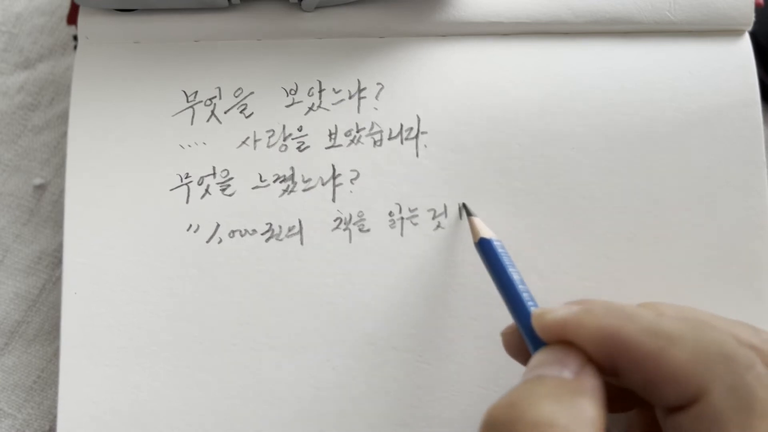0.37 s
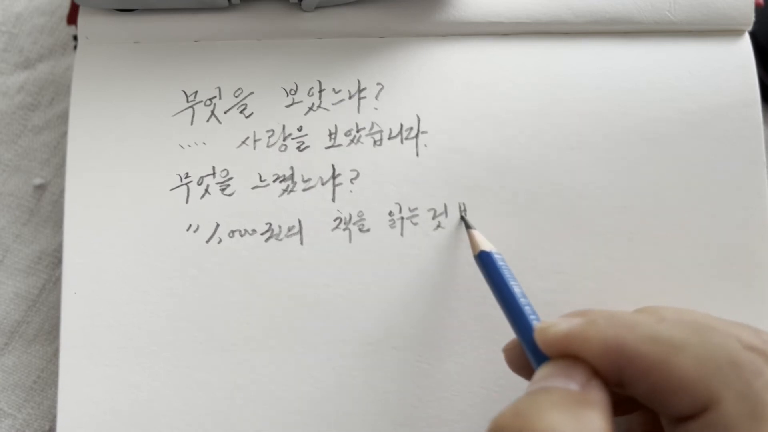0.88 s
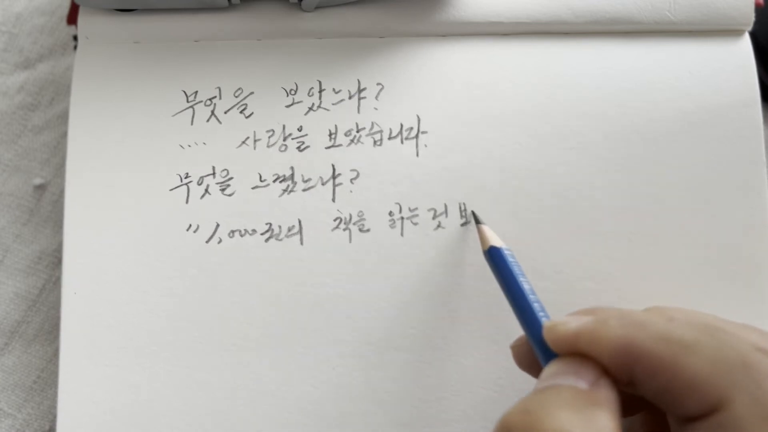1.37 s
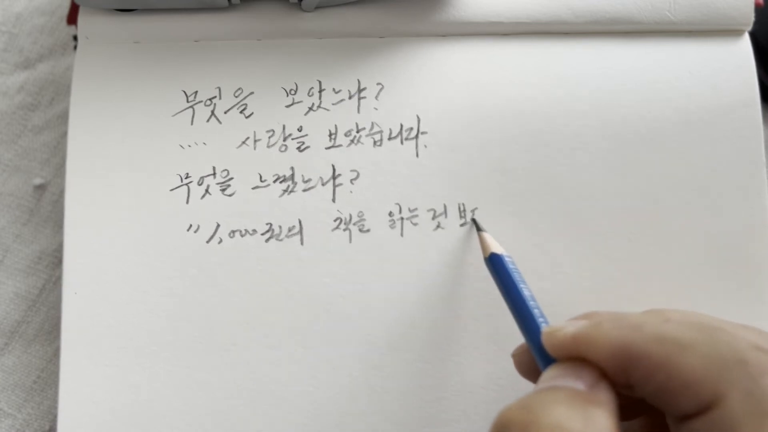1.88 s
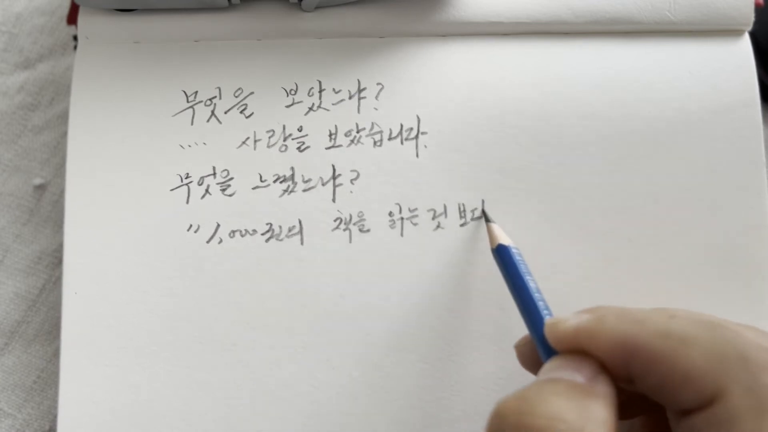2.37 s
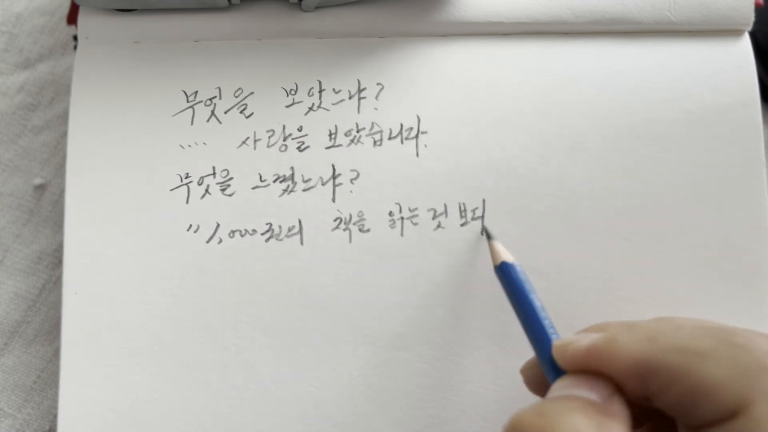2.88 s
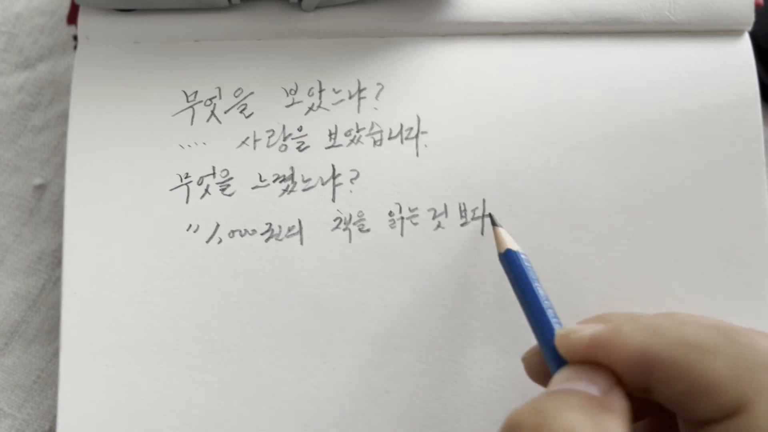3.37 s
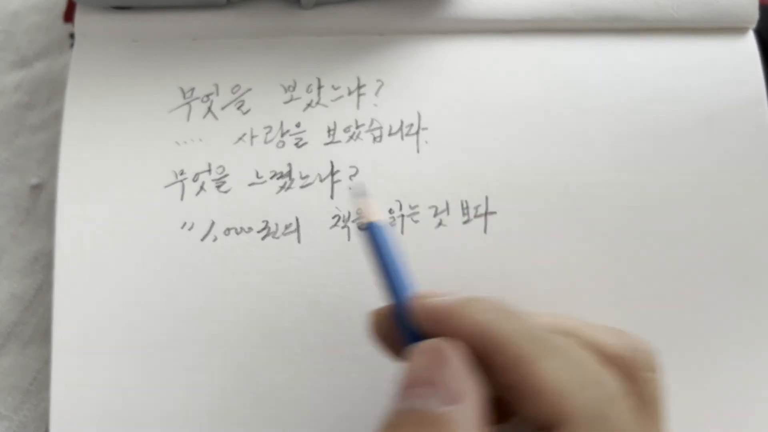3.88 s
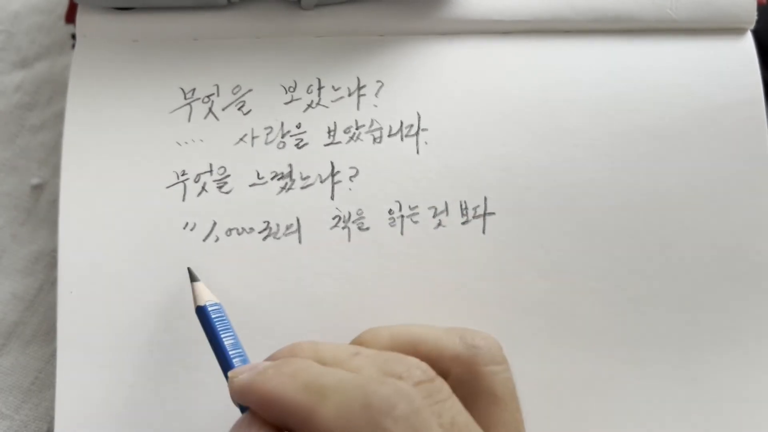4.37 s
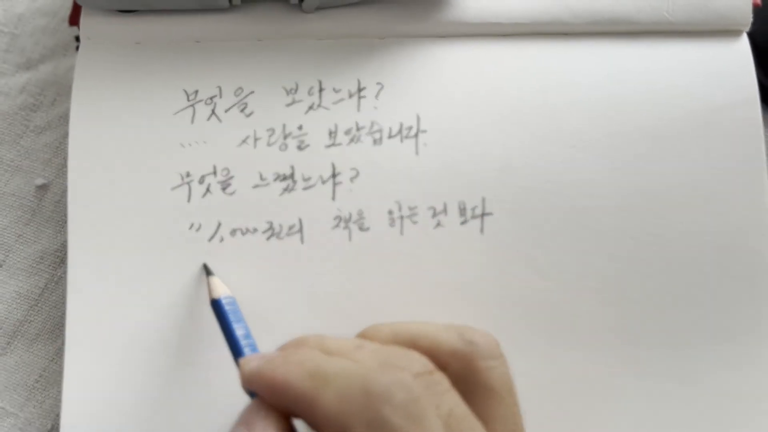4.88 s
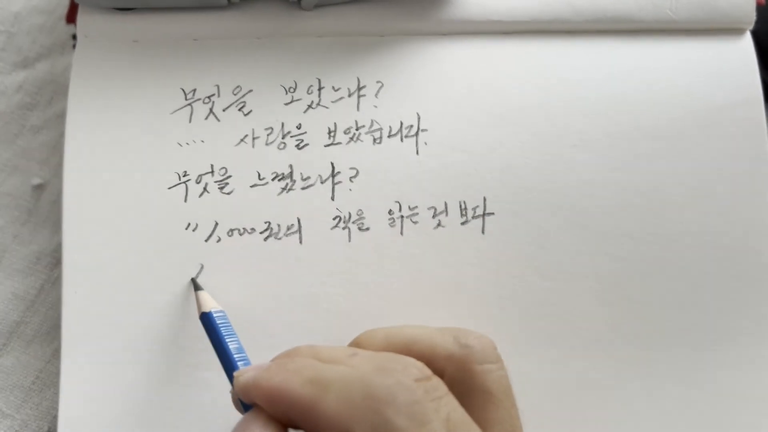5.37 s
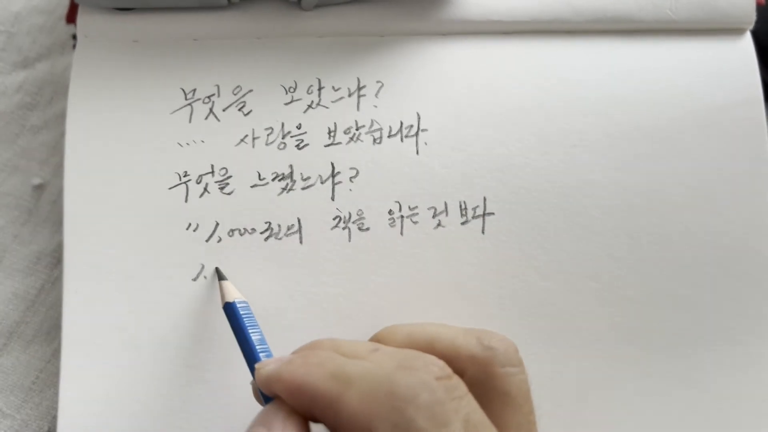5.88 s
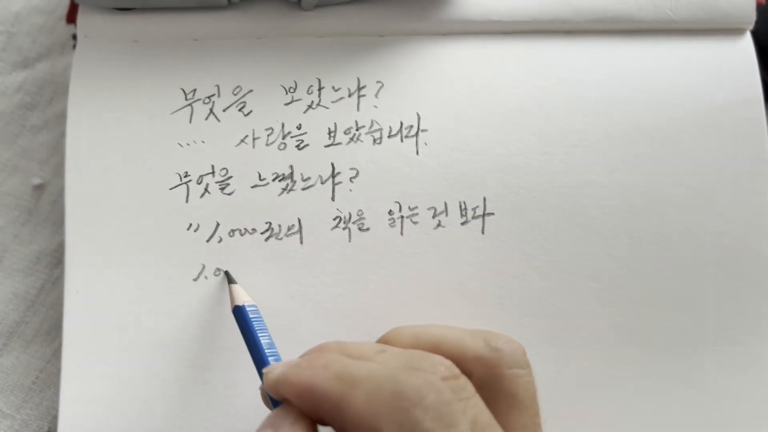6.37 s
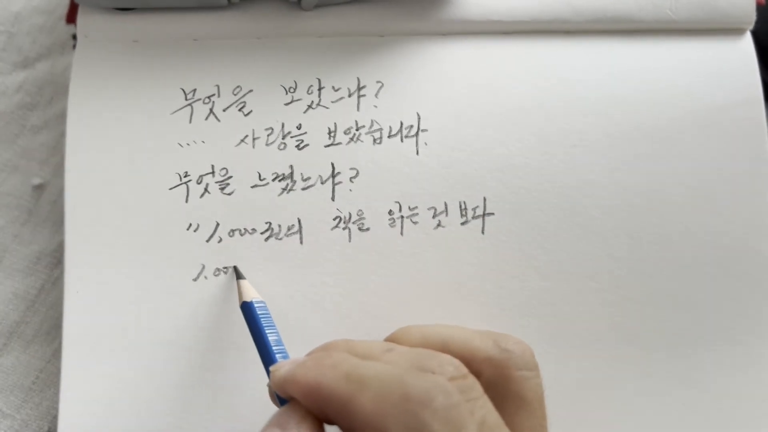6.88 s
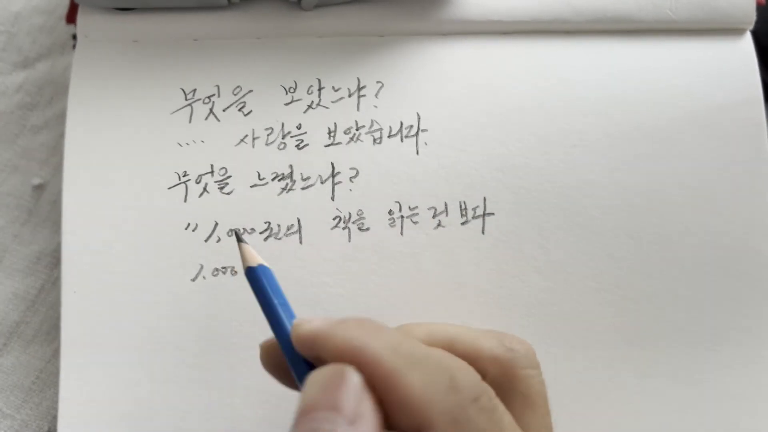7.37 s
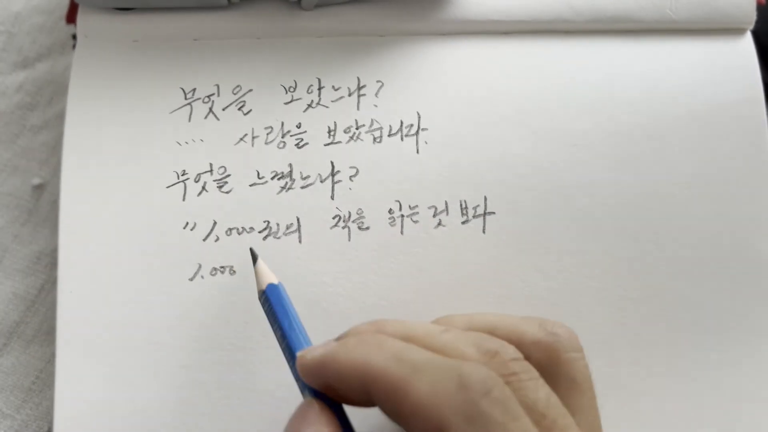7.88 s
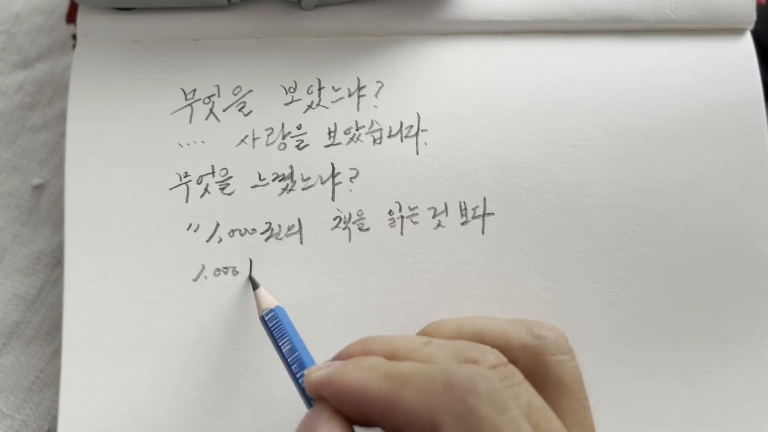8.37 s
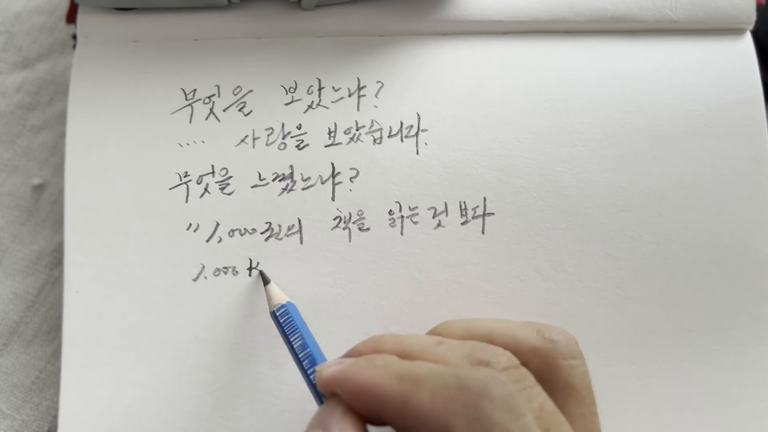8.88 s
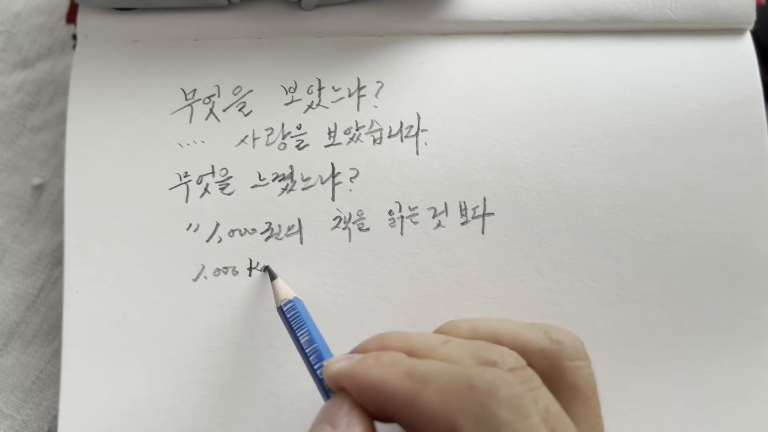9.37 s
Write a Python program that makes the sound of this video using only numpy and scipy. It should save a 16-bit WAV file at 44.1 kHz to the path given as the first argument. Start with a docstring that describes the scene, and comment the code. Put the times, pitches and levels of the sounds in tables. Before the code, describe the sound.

A pencil scratches short, dry strokes on a sketchbook page, with light taps, a hand rustle and low desk thumps in a quiet room.

```python
"""A pencil stroke scrapes over a low desk thump, then short strokes and taps follow, close and mono.
The lead catches on paper fibres and rings tip, sharpened cone, barrel and sketchbook; landings knock them.
A trembling, jolting arm booms the desk, and the hand slides on the page with a hiss and bumps the desk.
A short wash from the walls surrounds the close sounds; mains hum and steady room noise lie underneath."""
import sys
import numpy as np
from scipy import signal
from scipy.fft import rfft, irfft
from scipy.io import wavfile
from scipy.ndimage import uniform_filter1d

SR = 44100
rng = np.random.default_rng(int(sys.argv[2]) if len(sys.argv) > 2 else 0)


def magnitude_from_level(level_db):
    """Linear magnitude for a level in decibels (20 dB per decade)."""
    exponent = np.asarray(level_db, float) / 20
    return 10 ** exponent


def put_to_file(sound):
    """Save the sound as 16-bit audio at rate SR, in the file named by the first command-line argument."""
    columns = np.atleast_2d(sound).T  # one column per channel
    safe = np.clip(columns, -1, 1)
    whole_steps = np.round(safe * 32767)
    wavfile.write(sys.argv[1], SR, whole_steps.astype(np.int16))


N = 429534
TIME = np.arange(N) / SR

# pencil strokes: (start [s], speeding up [s], slowing down [s], tip hiss [dB], book minus tip [dB],
# pointedness of the speed arch [exponent])
STROKES = [(0.0, 0.004, 0.092, -51.5, 9, 0.69), (0.24, 0.043, 0.013, -63.5, 11.5, 1),
           (0.379, 0.084, 0.045, -53.5, 10, 0.56), (0.545, .017, 0.019, -61.5, 10.5, 1.1),
           (0.602, 0.034, .025, -71, 8.5, .8), (0.697, 0.039, 0.076, -58, 3.5, 0.83),
           (0.803, 0.011, 0.027, -66, 6, .6), (0.83, 0.037, .028, -62.5, 4, .5),
           (0.92, 0.013, .045, -60.5, 7, 0.84), (0.95, 0.06, .03, -61, 11, 0.43),
           (0.985, 0.061, 0.061, -49.5, 0.5, 1.27), (1.156, 0.022, 0.1, -53.5, -0.5, 0.72),
           (1.395, .015, .03, -83, 15, .4), (1.434, 0.039, 0.063, -54.5, 1.5, 0.71),
           (1.544, 0.011, .035, -60.5, 0.5, 1), (1.606, 0.11, .04, -62.5, 7.5, 0.67),
           (1.671, 0.044, 0.047, -48.5, 2.5, 0.95), (1.84, 0.0084, 0.11, -54, 0.5, 0.41),
           (1.89, 0.061, 0.045, -58.5, 7, 0.66), (2.0, 0.046, 0.014, -63, 6, 0.59),
           (2.113, 0.042, 0.031, -65.5, 10, 0.53), (2.27, .03, .1, -55, 10.5, 0.54),
           (2.3, 0.1, 0.12, -53.5, 8.5, 0.49), (2.5, .08, 0.16, -60.5, 12.5, 0.44),
           (2.818, 0.027, 0.02, -54.5, 4.5, 1.4), (2.96, 0.043, .03, -82.5, 16, .4),
           (3.107, 0.03, .03, -61.5, 7.5, 0.85), (3.13, 0.082, 0.05, -57, 8, 0.59),
           (3.307, 0.023, 0.015, -64, 3.5, 1.2), (4.77, .04, 0.036, -74, 12.5, .4),
           (4.929, 0.039, 0.022, -75.5, 19.5, 1.1), (5.101, .015, .05, -67, 13.5, .5),
           (5.147, 0.031, 0.1, -57, 6.5, 0.37), (5.2, 0.048, 0.062, -56, 5, 0.81),
           (5.27, 0.041, .022, -69, 20, 0.72), (5.35, .017, .015, -63.5, 3, 1.5),
           (5.385, 0.026, .08, -80, 8, 0.45), (5.591, .013, 0.037, -64, 15.5, 0.9),
           (5.64, 0.039, .025, -69, 5, 0.69), (5.867, 0.048, .065, -55.5, 3.5, 0.92),
           (5.95, 0.056, 0.037, -61, 10.5, 0.51), (6.02, 0.042, 0.044, -64.5, 12.5, 0.34),
           (6.13, 0.084, 0.087, -64.5, 13.5, 0.33), (6.32, 0.011, 0.13, -64.5, 9.5, 0.43),
           (6.449, 0.037, 0.077, -67.5, 17, 1.16), (6.55, .07, 0.026, -76.5, 5, 0.45),
           (6.767, 0.066, 0.035, -57.5, 8.5, 0.67), (6.932, 0.059, .11, -61.5, 9.5, 0.66),
           (7.085, 0.017, 0.041, -58, 5.5, 0.83), (7.156, 0.032, 0.042, -61.5, 10, 0.84),
           (7.415, 0.024, 0.023, -70.5, 17.5, 1), (8.225, 0.12, 0.052, -51.5, 12.5, 1.5),
           (8.415, 0.029, 0.0092, -71.5, 17.5, 1.2), (8.563, 0.0088, 0.0092, -68, 8, 1.1),
           (8.598, 0.052, 0.062, -54.5, 5, 0.65), (8.715, 0.026, 0.09, -59, 4, .4),
           (8.748, 0.053, 0.045, -59, 10, .4), (8.838, 0.034, .025, -76, 14.5, .4),
           (9.026, 0.047, 0.044, -66, 10, .5), (9.05, 0.07, 0.022, -56.5, 2, 1.2),
           (9.15, 0.044, 0.062, -60.5, 9.5, 0.29), (9.297, .013, 0.05, -57, 7, 0.86),
           (9.34, 0.042, 0.024, -62, 3.5, .4), (9.44, 0.028, 0.028, -81, 18.5, 0.55),
           (9.535, 0.03, .05, -62.5, 10, 0.47), (9.56, 0.055, 0.025, -58.5, 8, 0.53),
           (9.692, 0.057, .03, -55.5, 9, 0.89)]
# resonances of each body: (frequency [Hz], nominal width [Hz], relative level in each of three grips [dB] x 3)
TIP = [(4770, 1320, -3.5, -4.5, -6), (5460, 400, 0, -3.5, -2.5), (6120, 176, 2.5, -3, -4),
       (6800, 680, 0.5, -5.5, -8.5), (7620, 700, 1.5, -3.5, -4.5), (8580, 690, -1, -4, -7),
       (9410, 500, -7, -10, -15), (10410, 460, -5.5, -8.5, -9.5), (11500, 340, -9, -11.5, -14),
       (12050, 370, -7, -14, -13), (13200, 290, -22, -10, -9), (14270, 150, -29, -3, -29),
       (14430, 590, -5, -5, -13), (15500, 450, -15, -14, -26)]
CONE = [(2826, 247, 2, 2.5, 1.5), (3115, 160, 0, -5.5, -7.5), (3427, 167, 3.5, -3.5, -1.5),
        (3930, 580, 3, -11.5, -8)]
BARREL = [(1466, 87, 3.5, 3.5, 7), (1796, 400, 3, -8.5, -4.5), (2170, 83, -3.5, -2, 2),
          (2330, 1130, -33, -10, -6.5)]
BOOK = [(383, 100, 1.5, 4.5, 2.5), (485, 152, 2.5, 3, 4), (637, 182, 0.5, -2.5, -1.5),
        (907, 190, 3.5, 2, 0), (1049, 223, 2.5, 1, 1.5), (1216, 230, -2.5, -3, -1.5)]
# moments when the grip changes: (time [s])
GRIP_CHANGES = [4.2, 7.6]
# how steeply loudness follows stroke speed: (tip, cone, barrel, book [exponent])
SPEED_LAW = [1., 1, 0.88, 0.85]
# how flat the pencil lies, changing over time: (time [s], cone minus tip [dB], barrel minus tip [dB])
TILT = [(0.0, -2, -3.5), (0.45, -3, -4.5), (0.75, -4, -4.5), (1.2, -4, -6), (1.7, -3.5, -7),
        (1.95, -4.5, -6.5), (2.3, -4, -4.5), (2.5, -2, -4.5), (2.7, -7, -4.5), (3.2, -5.5, -10),
        (4.75, 6, 3), (5.2, 5.5, 1.5), (5.6, 4, 3), (5.92, 8, 1.5), (6.05, 6, 3), (6.2, 2, 4),
        (6.33, 6.5, 0), (6.5, 4, 3.5), (6.83, 2.5, 1), (7.0, 7.5, 3.5), (7.2, 3, 0.5), (8.3, 2.5, 2),
        (8.65, 2.5, -3), (8.73, 4, 3.5), (8.82, -1, 1), (9.11, 2.5, -1), (9.2, 2, 3), (9.35, 3, 1),
        (9.6, 1, 3.5), (9.74, 2, 0)]
# the drag reaching the desk's upper modes: (desk minus book in each of three grips [dB])
DRAG_DESK = [-13.5, -8.5, -7]
# desk modes: (frequency [Hz], nominal width [Hz], relative level [dB])
DESK = [(57.8, 5.4, 7), (76, 8.5, -18), (107, 9.8, -19), (175.8, 14.3, -12), (268, 167, -18)]
# desk under the trembling arm: (time [s], boom [dB], upper desk modes [dB], sway [dB])
ARM = [(0.0, -48, -55, -48), (0.3, -47.5, -67.5, -58), (0.7, -56.5, -64.5, -52), (1.3, -53.5, -59.5, -54),
       (1.8, -59, -63, -47), (2.5, -48, -61.5, -67), (3.3, -57.5, -61.5, -57), (3.5, -59.5, -64.5, -53),
       (3.56, -56, -50.5, -56), (3.66, -54, -63.5, -53), (3.8, -54.5, -63, -52.5), (4.4, -51.5, -62, -70),
       (5.1, -65, -63, -67), (5.35, -51, -59.5, -55.5), (6.1, -53.5, -63, -53.5), (6.5, -53, -56.5, -54),
       (6.75, -62, -62, -65), (7.3, -50.5, -61, -49), (7.95, -63, -66.5, -69), (8.25, -56, -61, -58),
       (8.35, -53.5, -53, -51), (8.45, -49, -63, -56.5), (8.7, -52, -57, -53), (8.95, -51, -53, -48),
       (9.2, -50, -61, -52), (9.5, -59, -65.5, -54), (9.74, -43.5, -52, -58)]
# the arm starts or stops and jolts the lowest desk mode: (time [s], approximate peak [dB])
JOLTS = [(0.0, -37), (0.071, -38), (0.391, -43), (1.061, -43), (1.18, -49), (1.45, -50), (1.852, -39.5),
         (2.109, -47), (2.279, -32), (2.701, -36.5), (2.83, -33.5), (3.02, -39), (3.14, -51), (3.539, -38),
         (3.95, -44), (4.678, -46), (5.188, -41), (5.66, -42), (5.82, -37), (6.12, -46), (6.95, -44.5),
         (7.26, -48), (7.49, -35), (8.38, -48), (8.529, -40), (9.068, -43), (9.311, -38), (9.612, -39),
         (9.709, -41)]
# room noise spectrum: (frequency [Hz], relative density [dB per Hz])
ROOM = [(18, -27.5), (30, 0), (81, -3), (138, -10.5), (170, -27), (355, -14.5), (512, -23), (760, -27),
        (844, -29), (1010, -29.5), (1760, -32), (2290, -33), (2750, -36), (12300, -40), (16000, -39.5)]
# mains hum partials: (frequency [Hz], nominal rms level [dB])
HUM = [(59.2, -65), (118.4, -64.5), (177.6, -83.5), (231.5, -75), (349.9, -74.5)]
# tip or hand landing: (time [s], book blow [dB], then barrel, tip and desk blows minus book blow [dB] x 3)
TAPS = [(0.216, -35.5, -9.5, -11, -12), (0.387, -36.5, -17, -15, -16), (0.551, -50, -16, -19, -13),
        (0.612, -43.5, -16, -24, -15), (0.841, -49, -5.5, -15, -9), (0.928, -53, -14, -16, -12),
        (1.161, -51, -6, 1, -5), (1.386, -37.5, -12, -27, -23), (1.451, -42, -14, -19, -16),
        (1.845, -41, -10, -4.5, 2), (2.111, -34.5, -9.5, -13.5, -16), (2.276, -36.5, -15, -27, -7),
        (2.824, -48, -11, -16, -12), (3.015, -34.5, -11, -19.5, -18), (3.474, -57.5, -6, 5.5, -2),
        (3.553, -38.5, -8, -3.5, -21), (3.556, -52.5, -3, 2, 17), (3.609, -36.5, -29, -18, -16),
        (3.885, -60, 4, 5, -6), (3.921, -64, -5, 9, -2), (4.304, -50, -7, -18, -9),
        (4.379, -56, -5, -14, -2), (4.748, -38.5, -9.5, -11, -12), (5.111, -61, -7, -18, -8),
        (5.298, -35, -21, -27, -18), (5.352, -49.5, -7, -16, -4), (5.444, -59, -6, 8, -3),
        (5.495, -62, 1, -9, -6), (5.528, -34.5, -13, -21, -21), (5.596, -55, -6, -13, -9),
        (5.654, -52, -7, -3, -9), (5.794, -51, -6, -20, -15), (5.812, -35, -10.5, -16, -20),
        (6.134, -61, -9, -18, -7), (6.327, -51, -6, -18, -9), (6.769, -45, -18, -16, -13),
        (7.172, -41, -10, -25, -13), (7.252, -55.5, -6, 7.5, -3), (7.327, -46.5, -14, -7, -10),
        (7.488, -28.5, -22, -12, -11), (8.111, -36, -11.5, -29, 0), (8.498, -46.5, -13, -2, 9),
        (8.532, -30, -12, -19, -4), (8.613, -40, -4.5, -17, -15), (8.929, -42, -20, -6, 7),
        (8.977, -31.5, -13.5, -18, -10), (9.301, -36.5, -25, -24, -15), (9.544, -53, -6, -20, -11),
        (9.696, -46, -9, -17, -13)]
# mode along the pencil, rung only by end-on blows: (frequency [Hz], width [Hz], gain [dB])
LENGTHWISE = (2280, 410, 15.6)
# wrist or palm on the desk: (time [s], blow [dB])
BUMPS = [(3.536, -47), (3.562, -29), (3.589, -40), (7.492, -57), (7.522, -41), (8.552, -53), (8.929, -25)]
# the hand's edge brushing the page: (start [s], speeding up [s], slowing down [s], hiss [dB],
# dull part minus hiss [dB], pointedness of the speed arch [exponent])
SLIDES = [(3.562, .058, .062, -55, -4.5, 1), (3.6, 0.14, .05, -53, -10, 0.55),
          (3.7, 0.09, 0.039, -47.5, -18, 0.75), (3.788, .04, .046, -56, -5, .5),
          (3.907, 0.035, 0.23, -50, -12, 0.76), (4.03, 0.073, 0.081, -55, -3, 0.55),
          (4.297, .01, 0.046, -60, -3.5, 0.94), (4.355, 0.026, 0.08, -72, 9.5, 1.2),
          (5.672, 0.065, 0.051, -61.5, -1, 1), (7.466, 0.02, 0.009, -52, 4, 1.8),
          (7.495, .03, 0.041, -71, 7, 0.26), (7.61, .046, .074, -67.5, -2, .5),
          (7.745, 0.047, 0.072, -60, -3.5, 1.05), (7.858, 0.014, .011, -66, 0, .8)]
# spectrum of skin on paper: (frequency [Hz], relative density [dB per Hz])
SKIN = [(710, -23), (1200, -2), (3290, 3.5), (5470, -2), (6160, 2.5), (9930, -2), (12100, -1), (15200, -5),
        (16000, -10)]
# faint whistle of the pencil barrel dragging over the page: (frequency [Hz], width of each filter pass [Hz],
# relative level [dB])
BARREL_WHISTLE = [(1986, 140, 7.5), (3324, 83, 8.5)]
# the dragged barrel whistles: (start [s], rise [s], fall [s], level [dB])
SQUEAKS = [(3.6, .02, 0.12, -63), (3.83, .02, .02, -72), (4.12, .04, .02, -69), (4.297, .008, .04, -63),
           (7.77, .025, .04, -72)]

BARREL_WITH_BOOK = 0.4  # dB of barrel per dB of book
# the lead skids after each landing: level relative to the tap's book blow, slowing down, book minus tip
SKID_DB, SKID_S, SKID_BOOK_DB = -33.5, 0.024, 15
ROOM_DB = -57  # nominal rms
WHISTLE_DB = -15  # nominal whistle level inside the hiss of the slides
DULL_LAW = 0.71  # exponent of the dull rub against hand speed


def unit(x):
    """Scale to rms 1."""
    return x / np.sqrt(np.mean(x ** 2))


def ring(x, hz, width):
    """One resonance, gain 1 at its centre."""
    return signal.lfilter(*signal.iirpeak(hz, hz / width, fs=SR), x)


def colour(points):
    """Noise of rms 1 with a spectrum given as (Hz, dB)."""
    hz, db = np.transpose(points)
    f = np.arange(N // 2 + 1) * SR / N + 1
    gain = magnitude_from_level(np.interp(np.log(f), np.log(hz), db))
    return unit(irfft(rfft(rng.standard_normal(N)) * gain, N))


def walk(rate):
    """Random levels held 1 / rate s and slewed twice."""
    hold = int(SR / rate)
    steps = np.repeat(rng.standard_normal(N // hold + 1), hold)
    return uniform_filter1d(uniform_filter1d(steps, hold), hold)[:N]


def arch(start, rise, fall, pointed):
    """Samples of one movement and its speed, 1 at the fastest moment."""
    span = slice(int(start * SR), int((start + rise + fall) * SR))
    ramp = np.interp(TIME[span] - start, [0, rise, rise + fall], [0, 1, 0])
    return span, ramp ** pointed


def body(force, modes, damp=1., roam_db=0.):
    """A force rings every mode, each by grip and by how far the roaming tip lies from its nodes."""
    grip = np.searchsorted(GRIP_CHANGES, TIME)
    out = np.zeros(N)
    for k, (hz, width, *db) in enumerate(modes):
        gain = magnitude_from_level(np.array(db)[grip] + roam_db * walk(22))
        # neighbouring modes answer with opposite polarity
        out += (-1) ** k * gain * ring(force, hz, width * damp)
    return out, grip


def rubbed(force, modes, damp, roam_db):
    """A rubbed body, rms 1 in every grip."""
    out, grip = body(force, modes, damp, roam_db)
    return out / np.sqrt(np.bincount(grip, out ** 2) / np.bincount(grip))[grip]


def fibres(spread_db, patchy_db):
    """Dense catches of uneven size over a patchy paper grain."""
    return rng.standard_normal(N) * magnitude_from_level(spread_db * rng.exponential(size=N) + patchy_db * walk(60))


def pencil():
    """The dragging lead shakes tip, sharpened cone, barrel, book and the desk under it."""
    drag = fibres(spread_db=2.0, patchy_db=2.06)
    tip, cone, barrel, book = (rubbed(drag, modes, 1., roam_db=1.6) for modes in (TIP, CONE, BARREL, BOOK))
    grip = np.searchsorted(GRIP_CHANGES, TIME)
    under = unit(ring(drag, 167.6, 25.) + magnitude_from_level(-5) * ring(drag, 108.0, 30.))
    book = book + under * magnitude_from_level(DRAG_DESK)[grip]

    skids = [(s, .005, SKID_S, db + SKID_DB, SKID_BOOK_DB, 1.2) for s, db, *_ in TAPS]
    gains = np.zeros((4, N))
    for start, rise, fall, db, book_db, pointed in STROKES + skids:
        span, speed = arch(start, rise, fall, pointed)
        rel_db = [0, 0, BARREL_WITH_BOOK * book_db, book_db]
        stroke = [magnitude_from_level(db + rel) * speed ** law for rel, law in zip(rel_db, SPEED_LAW)]
        # where movements overlap, the louder one is heard
        gains[:, span] = np.maximum(gains[:, span], stroke)
    s, *tilt_db = np.transpose(TILT)
    gains[1:3] *= magnitude_from_level([np.interp(TIME, s, db) for db in tilt_db])
    return np.sum(uniform_filter1d(gains, size=132) * [tip, cone, barrel, book], axis=0)


def desk():
    """The arm's tremor booms in the desk's lowest modes and sways it below them; jolts set the lowest ringing."""
    tremor = ring(rng.standard_normal(N), 95.0, 206.0)
    modes = [magnitude_from_level(db) * ring(tremor, hz, width) for hz, width, db in DESK]
    boom = modes[0] - modes[1]
    upper = modes[2] - modes[3] + modes[4]
    sway = rng.standard_normal(N)
    for _ in range(3):
        sway = ring(sway, 18.7, 14.5)
    s, *columns = np.transpose(ARM)
    out = sum(magnitude_from_level(np.interp(TIME, s, db)) * unit(part) for db, part in zip(columns, (boom, upper, sway)))

    s, db = np.transpose(JOLTS)
    push = np.zeros(N)
    push[(s * SR).astype(int)] = -magnitude_from_level(db)
    push = uniform_filter1d(uniform_filter1d(push, size=200), size=200)
    hz, width, _ = DESK[0]
    # undo the narrow resonance's small answer to a brief push
    return out + ring(push, hz, width) * SR / (2 * np.pi * width)


def room():
    """Nearly steady air and microphone noise, with hum partials that waver in level."""
    hum = sum(np.sqrt(2) * magnitude_from_level(db + 5.1 * walk(6)) * np.sin(2 * np.pi * hz * TIME) for hz, db in HUM)
    return magnitude_from_level(ROOM_DB + 0.17 * walk(8.4)) * colour(ROOM) + hum


def taps():
    """A short push clicks and rings pencil and book, a crack rings the tip, a slow push booms the desk."""
    s, db, *rel_db = np.transpose(TAPS)
    blows = np.zeros((4, N))  # book, barrel, tip, desk
    blows[:, (s * SR).astype(int)] = -magnitude_from_level(db + np.array([0 * db, *rel_db]))
    s, db = np.transpose(BUMPS)
    blows[3, (s * SR).astype(int)] += magnitude_from_level(db)

    # a short silent lead-in, then the push
    push = np.r_[np.zeros(20), np.hanning(19)]
    book, barrel = (np.convolve(b, push)[:N] for b in blows[:2])
    # the pages take a moment to answer
    knock = magnitude_from_level(10.5) * np.roll(body(book, BOOK, damp=1.0)[0], 30)

    # an end-on blow also rings the pencil along its length
    along_hz, width, along_db = LENGTHWISE
    click = magnitude_from_level(-1.5) * barrel
    click += magnitude_from_level(16.5) * body(barrel, BARREL + CONE, damp=2.6)[0]
    click += magnitude_from_level(along_db) * ring(barrel, along_hz, width)
    # the click returns inverted after about 1.5 ms, which combs it
    click = click - 0.11 * np.roll(click, 64)

    crack = rng.standard_normal(160) * np.exp(-np.arange(160) / (.001 * SR))
    tick = magnitude_from_level(12.5) * body(np.convolve(blows[2], crack)[:N], TIP, damp=1.3)[0]

    slow = np.convolve(blows[3], np.hanning(60))[:N]
    boom = magnitude_from_level(17.5) * sum(magnitude_from_level(db) * ring(slow, hz, 2.0 * width) for hz, width, db in DESK[1:])
    return knock + click + tick + boom


def hand():
    """Skin on paper: a smooth hiss, a dull part through the book and at times a faint whistle from the dragged
    pencil barrel."""
    dull = rubbed(rng.standard_normal(N), BOOK, 2.23, roam_db=1.5)
    rub = rng.standard_normal(N)
    whistle = unit(sum(magnitude_from_level(db) * ring(ring(rub, hz, width), hz, width) for hz, width, db in BARREL_WHISTLE))
    hiss = colour(SKIN) * magnitude_from_level(1.2 * walk(30)) + magnitude_from_level(WHISTLE_DB + 3 * walk(15)) * whistle

    gains = np.zeros((2, N))
    for start, rise, fall, db, dull_db, pointed in SLIDES:
        span, speed = arch(start, rise, fall, pointed)
        slide = [magnitude_from_level(db) * speed, magnitude_from_level(db + dull_db) * speed ** DULL_LAW]
        gains[:, span] = np.maximum(gains[:, span], slide)
    squeak = np.zeros(N)
    for start, rise, fall, db in SQUEAKS:
        span, speed = arch(start, rise, fall, 0.63)
        squeak[span] = magnitude_from_level(db) * speed
    return np.sum(uniform_filter1d(gains, size=132) * [hiss, dull], axis=0) + squeak * whistle


def walls(near):
    """A short decaying noise tail, 60 dB down in 0.15 s, band-limited as a soft wash."""
    lag = np.arange(SR // 4) / SR
    tail = rng.standard_normal(len(lag)) * magnitude_from_level(-60 * lag / 0.15) * (lag > .004)
    return ring(signal.fftconvolve(near, tail / np.linalg.norm(tail))[:N], 860.0, 2900.0)


def scene():
    """Close sounds get a short wash from the walls; both channels are alike."""
    near = pencil() + taps() + hand()
    return np.tile(near + magnitude_from_level(-18.0) * walls(near) + desk() + room(), (2, 1))


def roll_off(x):
    """The treble ends steeply here."""
    return signal.sosfilt(signal.butter(12, 16460, fs=SR, output="sos"), x)


def record(dry):
    """The top is cut steeply above 15.72 kHz."""
    top_cut = signal.ellip(12, .2, 60, 15720, fs=SR, output="sos")
    return roll_off(signal.sosfilt(top_cut, dry))


dry = scene()
out = record(dry)
put_to_file(out)
```